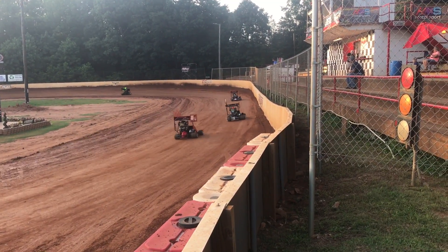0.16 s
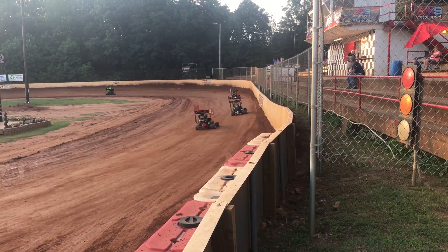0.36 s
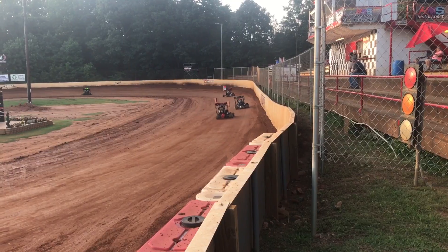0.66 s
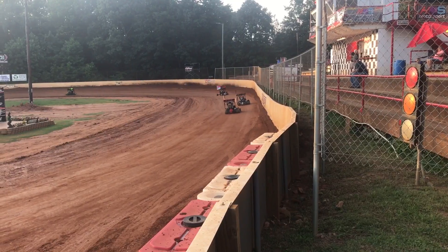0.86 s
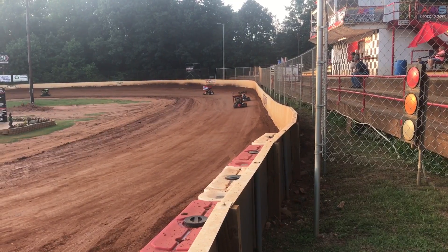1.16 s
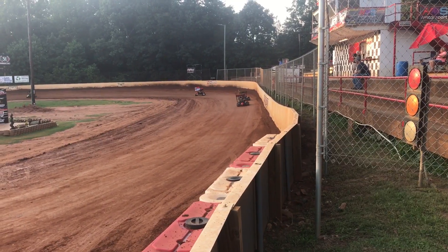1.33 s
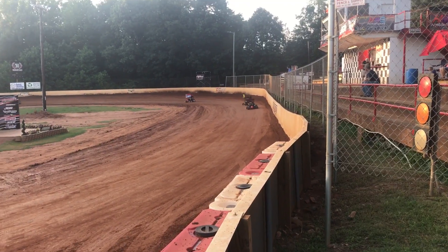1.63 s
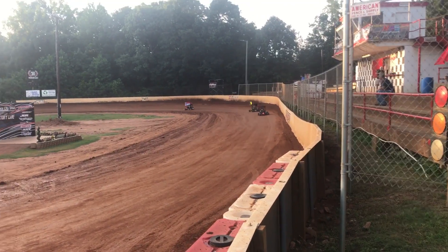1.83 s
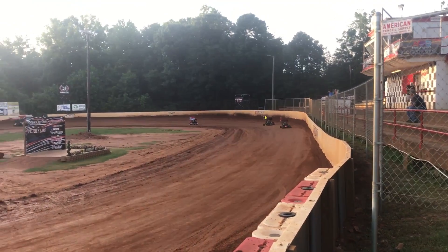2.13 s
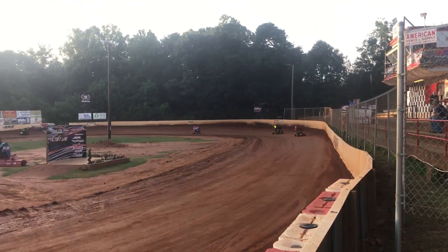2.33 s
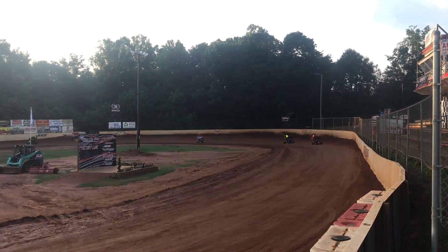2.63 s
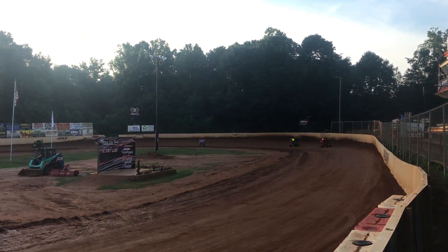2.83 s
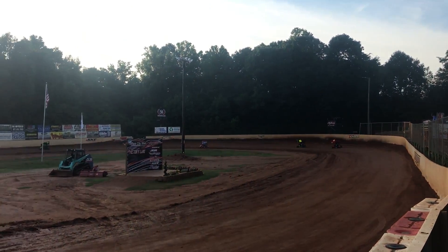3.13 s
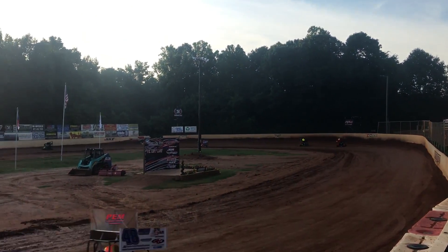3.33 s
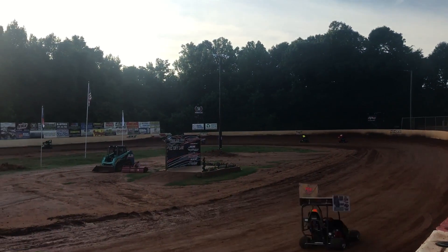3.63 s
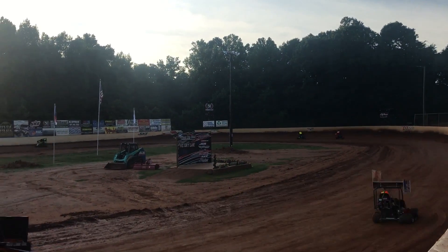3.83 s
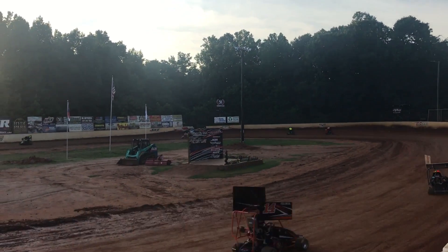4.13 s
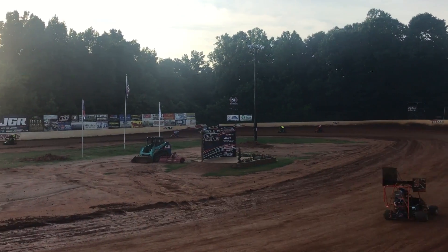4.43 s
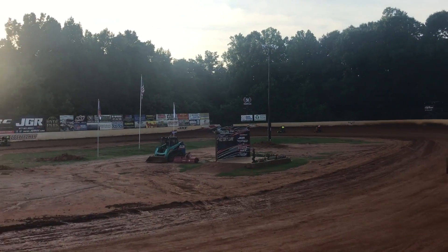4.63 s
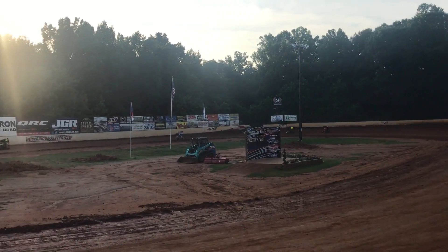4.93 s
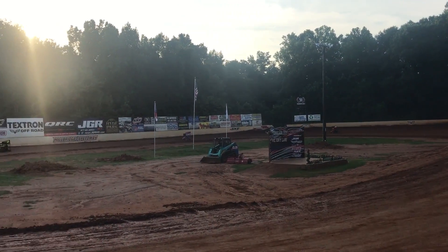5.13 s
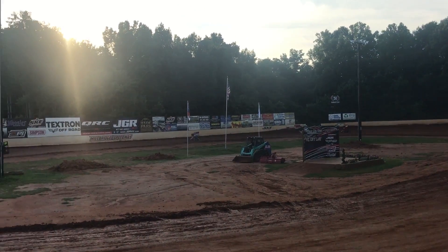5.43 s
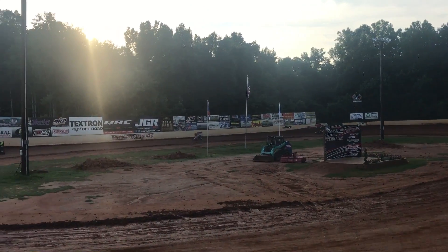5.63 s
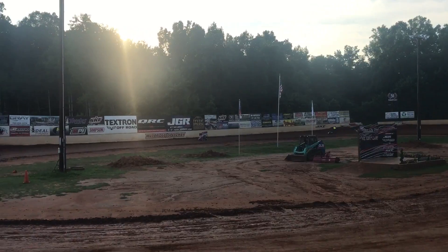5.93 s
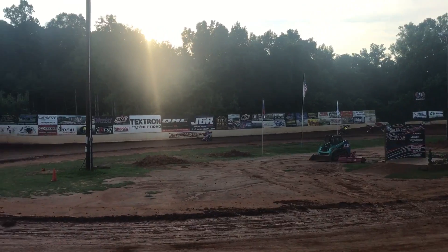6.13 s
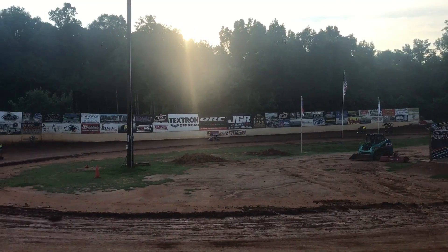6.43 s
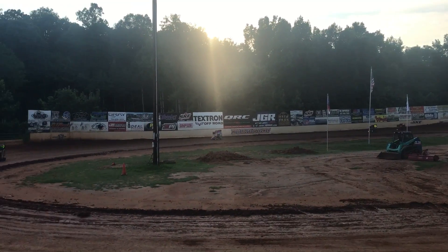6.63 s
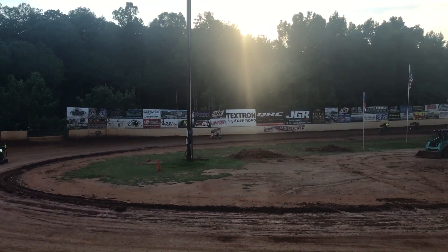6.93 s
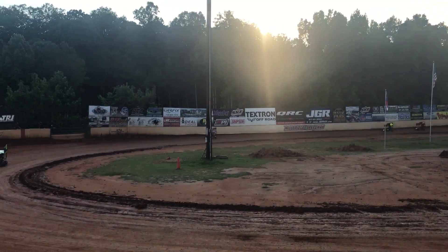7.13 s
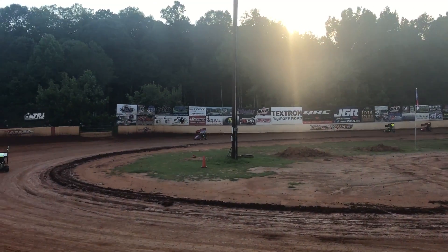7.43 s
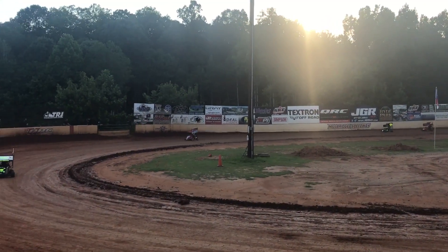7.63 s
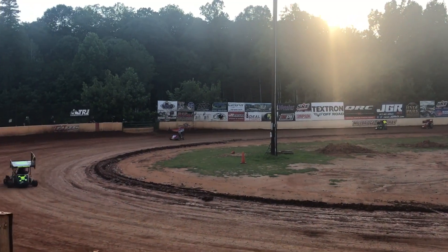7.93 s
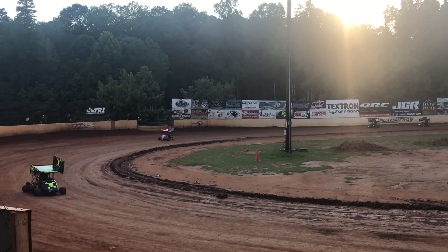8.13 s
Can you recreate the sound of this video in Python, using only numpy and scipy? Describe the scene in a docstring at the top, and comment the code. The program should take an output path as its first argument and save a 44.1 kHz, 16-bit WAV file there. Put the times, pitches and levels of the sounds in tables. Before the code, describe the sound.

A pack of four-stroke karts drones at high revs, each engine a rapid hard-edged buzz with deep throb, hollow bark and gritty hiss. Pitches sag into the turn and climb out, beating against one another. After an early full dropout, the sound returns, softens, surges around three to four seconds, then gradually recedes and dulls, growing slightly again at the end. Close open-air trackside pickup over a distant engine drone.

```python
"""Beside the wall of a dirt oval: karts with single-cylinder four-stroke engines race past the microphone.
Every firing thumps the exhaust pipe, rings the silencer and spits a puff of gas that barks, rasps and sizzles.
Pitch sags into the turn and climbs out of it; tailpipes that swing this way crackle, and engines whine.
Wall, stand and trees throw the noise back over a far drone. The sound cuts out for about a second early on."""
import sys
import numpy as np
from scipy import signal
from scipy.fft import rfft, irfft, next_fast_len
from scipy.io import wavfile
from scipy.ndimage import uniform_filter1d

SR = 44100
rng = np.random.default_rng(int(sys.argv[2]) if len(sys.argv) > 2 else 0)


def digitize_waveform(pressure):
    """Quantize a signal to 16-bit integers and store it at the path in sys.argv[1].

    Rows of a 2-D input are taken as channels; values are limited to [-1, 1].
    """
    field = np.atleast_2d(pressure).T
    bounded = np.clip(field, -1, 1)
    quanta = np.round(bounded * 32767).astype(np.int16)
    wavfile.write(sys.argv[1], SR, quanta)


N = 365148
TIME = np.arange(N) / SR  # s

SAG_HZ_PER_S, SAG_DEPTH_HZ = 4.5, 5.5  # slope of the sag near the apex, and its limit
EXIT_AFTER_S, EXIT_HZ_PER_S = 2.15, 1.7  # this long after the apex the climb steepens by so much
FADE_DB_PER_S = 15.5  # a kart emerges from the pack and sinks back into it
FLARE_LIFT_DB = 2  # weight of a flare's amplitude in bringing its kart forward
SWAY_DB, SWAY_PER_S = 1.5, 4  # each kart's loudness sways as it slides and bounces
RASP_DB, RASP_FOLLOWS = -24, 0.78  # mean level of the rasp, share of the sizzle's swing
GROUND_LOSS = 0.6  # share of the sizzle's swing that the top of the growl follows
SIZZLE_DB, SIZZLE_SWING = 0.3, 1.15  # trim on the sizzle curve's mean, stretch of its swing
CUTOFF_HZ = 15750


def from_db(db):
    """Decibels to gain."""
    return 10 ** (np.asarray(db) / 20)


def rms_one(x):
    """Scale to unit rms."""
    return x / np.sqrt(np.mean(x ** 2) + 1e-20)


def in_time(rows):
    """The columns of a curve table at every sample."""
    s, *columns = np.transpose(rows)
    return [np.interp(TIME, s, c) for c in columns]


def steady(x, seconds):
    """Take out slow swells, keep the single firings."""
    size = int(max(seconds, 0.03) * SR)
    power = uniform_filter1d(uniform_filter1d(x ** 2, size), size)
    return x / np.sqrt(np.abs(power) + 1e-12)


def split(x, hz):
    """The parts of a sound below and above a frequency."""
    low = signal.sosfiltfilt(signal.butter(4, hz, fs=SR, output="sos"), x)
    return low, x - low


def drift(per_s):
    """Slow chance with a spread near 1."""
    return np.interp(TIME * per_s, np.arange(1000), rng.standard_normal(1000))


def fade(x, seconds):
    """Every click becomes an exponential decay."""
    r = np.exp(-1 / (seconds * SR))
    return signal.lfilter([1 - r], [1, -r], x + 1e-18)


def delayed(x, seconds):
    """Read a sound late; the delay may move."""
    return np.interp(TIME - seconds, TIME, x, left=0)


def resonate(x, modes, scale):
    """Parallel resonances, their pitches scaled together."""
    out = 0
    for hz, width, db in modes:
        r = np.exp(-np.pi * width / SR)
        poles = [1, -2 * r * np.cos(2 * np.pi * hz * scale / SR), r * r]
        zeros = [(1 - r * r) / 2, 0, (r * r - 1) / 2]
        out = out + from_db(db) * signal.lfilter(zeros, poles, x + 1e-18)
    return out


def noise(spectrum):
    """Noise of a given colour, rms 1."""
    hz, db = np.transpose(spectrum)
    size = next_fast_len(N)
    bins = np.maximum(np.fft.rfftfreq(size, 1 / SR), 1)
    colour = from_db(np.interp(np.log(bins), np.log(hz), db))
    return rms_one(irfft(rfft(rng.standard_normal(size)) * colour, size)[:N])


def far_drone():
    """Karts on the far side, blurred by distance into steady coloured noise."""
    # colour of the drone: f/Hz, relative level/dB per Hz
    drone_colour = [(20, -35.5), (68, -14.5), (102, -3), (135, -9.5), (260, -4.5), (370, -13), (650, -17.5),
                    (1100, -21), (2000, -30.5), (16000, -38.5)]
    return from_db(-24.5) * noise(drone_colour)


def surroundings(x, wet_db, t60):
    """Scattered echoes from the stand, the boards and the trees."""
    t = np.arange(SR) / SR
    hits = rng.random(SR) < 400 / SR  # about 400 echoes per second
    echoes = rng.standard_normal(SR) * hits * from_db(-60 * t / t60) * (t > 0.012)
    echoes = echoes / np.sqrt(np.sum(echoes ** 2))
    return x + from_db(wet_db) * signal.fftconvolve(x, echoes)[:N]


def whine(rate):
    """Clean high orders of one engine, each swelling and fading on its own."""
    # multiples of the firing rate
    orders = [18, 19, 20, 21, 26, 28, 31]
    # mean strength of each order: relative level/dB
    orders_db = [0, -8.5, 0.5, -1, -9.5, -6, -8.5]
    turn = 2 * np.pi * np.cumsum(rate * (1 + 0.001 * drift(14))) / SR
    tones = 0
    for order, db in zip(orders, orders_db):
        tones = tones + from_db(db + 2 * drift(7)) * np.sin(order * turn)
    return rms_one(tones)


def gas(puffs, colour, between_db):
    """Turbulence that flares with each puff over a weaker steady rush."""
    return noise(colour) * np.sqrt(puffs + from_db(between_db) ** 2)


def gas_sizzle(puffs):
    """The finest turbulence of the puffs, at the very top."""
    # colour of the gas noise: f/Hz, relative level/dB per Hz
    sizzle_colour = [(7500, -24.5), (9200, 0.5), (9900, 0.5), (10450, -3.5), (11300, -1), (12500, -0.5),
                     (15800, -6)]
    return steady(gas(puffs, sizzle_colour, between_db=-0.5), seconds=0.1)


def gas_rasp(puffs, crackle_power):
    """Treble turbulence of the puffs, plus the crackle of tailpipes that point this way."""
    # colour of the gas noise: f/Hz, relative level/dB per Hz
    rasp_colour = [(1300, -41.5), (2000, -2), (2600, -0.5), (4200, -2.5), (4900, -6.5), (5600, -3.5),
                   (6800, -2.5), (7600, -6), (8400, -4), (9300, -10), (11000, -35.5)]
    # colour of the crackle: f/Hz, relative level/dB per Hz
    crackle_colour = [(1500, -29), (2500, -0.5), (3200, -1.5), (4600, -9), (5800, -0.5), (6800, 0.5),
                      (8000, -12), (15000, -32.5)]
    crackle = noise(crackle_colour) * np.sqrt(crackle_power)
    return steady(gas(puffs, rasp_colour, between_db=-1.5), seconds=0.3) + crackle


def silencer_bark(ring, puffs, near_db):
    """Silencer ring, echoed by the surroundings, mixed with the middle turbulence of the puffs."""
    # colour of the gas noise: f/Hz, relative level/dB per Hz
    bark_colour = [(250, -27), (500, -9.5), (720, -5.5), (980, 0), (1400, -4), (1900, -6), (2400, -18),
                   (4000, -50)]
    band = signal.butter(2, [620, 1900], "band", fs=SR, output="sos")
    ring = surroundings(signal.sosfilt(band, ring), wet_db=0.5, t60=0.5)
    ring = steady(ring, seconds=0.15)
    rush = steady(gas(puffs, bark_colour, between_db=-0.5), seconds=0.1)
    # the bark gains an edge when a kart is close
    dull, edge = split(from_db(-3.5) * ring + from_db(-3.0) * rush, hz=1544)
    return dull + edge * from_db(0.5 * near_db)


def exhaust_pipes(boom, growl_db, swing_db):
    """Pipe boom with its echoes: a deep throb below and a growl above."""
    # the pipe's own resonance, ahead of a 1 % lowering: f/Hz, width/Hz, level/dB
    pipe_modes = [(409.6, 49, 1)]
    # level of the deep throb: t/s, level/dB
    throb_curve = [(1.0, -21.0), (2.0, -26), (2.27, -21.5), (2.42, -30.5), (3.15, -17), (4.35, -22.5),
                   (4.65, -21), (4.9, -24.5), (5.1, -16.5), (5.27, -30), (5.9, -22.5), (6.58, -27),
                   (7.1, -21.5), (8.25, -22.5)]
    throb_db, = in_time(throb_curve)
    boom = boom + resonate(boom, pipe_modes, 0.99)
    throb, growl = split(surroundings(boom, wet_db=-7.0, t60=0.47), hz=165)
    # soft ground swallows the top orders of far karts
    body, top = split(growl, hz=350)
    growl = body + top * from_db(GROUND_LOSS * swing_db)
    # uneven burning roughens the growl
    growl = growl * from_db(1.4 * drift(130))
    throb = from_db(throb_db) * steady(throb, seconds=0.33)
    return throb + from_db(growl_db - 1.0) * steady(growl, seconds=0.19)


def firing_rate(apex_s, apex_hz, climb, top_hz):
    """Revs sag into the turn, then climb from the apex until the engine is flat out."""
    before, after = np.maximum(apex_s - TIME, 0), np.maximum(TIME - apex_s, 0)
    sag = SAG_DEPTH_HZ * np.tanh(SAG_HZ_PER_S * before / SAG_DEPTH_HZ)
    rise = climb * after + EXIT_HZ_PER_S * np.maximum(after - EXIT_AFTER_S, 0)
    return np.minimum(apex_hz + sag + rise, top_hz)


def presence(from_s, until_s):
    """Gain of a kart that emerges, holds its place and sinks back."""
    outside_s = np.maximum(from_s - TIME, 0) + np.maximum(TIME - until_s, 0)
    return from_db(-FADE_DB_PER_S * outside_s)


def flare(run):
    """Power that one kart's tailpipe beams at the microphone as it swings past."""
    # flares: run, t/s, peak level/dB relative to the rasp, width/s (power falls to about a third there)
    swings = [("A", 0.14, -6, .2), ("A", 2.18, -8, .12), ("E", 2.9, -11, 0.25), ("E", 3.8, -7.5, .1),
              ("F", 3.9, -7.5, .12), ("F", 5.14, -7, .14), ("F", 5.61, 4.2, 0.09), ("F", 6.36, -1.5, 0.19),
              ("F", 6.3, -2.5, .13)]
    power = 0
    for name, s, db, width in swings:
        if name == run:
            power = power + from_db(db) ** 2 / (1 + ((TIME - s) / width) ** 2) ** 1.5
    return power


def firings(cycles, jitter_s, uneven_db):
    """One click per combustion, each a little off in time and strength."""
    chance = rng.standard_normal((int(cycles[-1]), 2))
    at = np.interp(np.arange(1, len(chance) + 1), cycles, TIME) + jitter_s * chance[:, 0]
    clicks = np.zeros(N)
    clicks[np.clip((at * SR).astype(int), 0, N - 1)] = from_db(uneven_db * chance[:, 1])
    return clicks


def pipe_wave(cycles, build_db, smear, size=512):
    """The exhaust pressure wave: a blow-down, then ringing until the next firing."""
    # tailpipe orders 1, 2, 3, .. of the firing rate, before each kart's own spread: level/dB
    pipe_db = [-13, -4.5, -12.5, -11.5, -2, -4, -14.5, -14, -9.5, -13.5, -14.5, -12.5, -23, -17.5, -26.5,
               -26]
    orders = np.arange(size // 2 + 1)
    level_db = np.interp(orders, np.arange(len(pipe_db)) + 1, pipe_db, left=-40, right=-50)
    level_db = level_db + build_db * rng.standard_normal(len(orders))
    cepstrum = irfft(np.log(from_db(level_db)))
    # a causal cycle: all its energy follows the valve opening
    cepstrum[1:size // 2] *= 2
    cepstrum[size // 2 + 1:] = 0
    # the silencer holds the higher orders back, which blunts the peak
    spectrum = np.exp(rfft(cepstrum) - 1j * smear * orders ** 2)
    cycle = -irfft(spectrum * (orders <= len(pipe_db)))
    return np.interp(cycles % 1 * size, np.arange(size + 1), np.append(cycle, cycle[0]))


def kart(rate, gain, build_spread, puff_rise_s, puff_fall_s, crack_fall_s, beaming):
    """One engine: pipe boom, silencer ring, and the power of its gas puffs and cracks."""
    # silencer can, before each kart's own spread: f/Hz, width/Hz, level/dB
    can_modes = [(633, 200, -9.5), (934, 120, -3), (1130, 240, -9), (1480, 660, -6.5)]
    cycles = np.cumsum(rate * (1 + 0.003 * drift(14))) / SR + rng.random()
    boom = gain * pipe_wave(cycles, build_db=1.1, smear=0.0509) * from_db(1.8 * drift(35))
    clicks = gain * firings(cycles, jitter_s=0.00011, uneven_db=1.22)
    ring = resonate(clicks, can_modes, 1 + build_spread * rng.uniform(-1, 1))
    # treble is beamed out of the tailpipe, so the best placed kart owns the rasp
    blasts = clicks ** (2 * beaming)
    puffs = fade(fade(blasts, puff_rise_s), puff_fall_s)
    cracks = fade(fade(blasts, 0.00038), crack_fall_s)
    # the track wall returns each puff a few milliseconds later
    wall_s = 0.0033 * (1 + 0.3 * np.sin(2 * np.pi * (0.46 * TIME + rng.random())))
    puffs = puffs + from_db(-16.5) * delayed(puffs, wall_s)
    return boom, ring, puffs, cracks


def pack():
    """All karts together: boom, ring, power of the puffs and of the crackle, and whine."""
    # one row per run through a turn: name, apex t/s, firing rate at the apex f/Hz, climb/(Hz per s),
    # flat-out rate f/Hz, heard from t/s, heard until t/s, prominence level/dB, whine level/dB
    runs = [("A", 0, 41.7, 2.85, 47.7, 0, 2.4, -3.5, -47), ("B", 0, 43.2, 2.6, 49.7, 0, 2, -7, -41.5),
            ("C", 0, 45.7, 4.1, 52.2, 0.25, 2.14, -6.5, -39), ("D", 0, 51.7, 2.7, 55, 0, 1.1, -9.5, -43.5),
            ("E", 3.97, 42.7, 2.35, 55, 2.65, 8.28, -5, -43),
            ("F", 4.66, 43.1, 2.45, 55.5, 3.1, 7, -3, -32.5),
            ("G", 4.5, 47.8, 2.5, 51, 6.5, 8.28, -2.2, -46),
            ("H", 7.9, 46.1, 0.36, 52, 7.45, 8.28, -1.9, -41)]
    karts = []
    for name, apex_s, apex_hz, climb, top_hz, from_s, until_s, prominence_db, whine_db in runs:
        rate = firing_rate(apex_s, apex_hz, climb, top_hz)
        heard = presence(from_s, until_s)
        beam = flare(name)
        lift = (1 + from_db(FLARE_LIFT_DB) * beam ** 0.5) ** 0.5
        gain = from_db(prominence_db + SWAY_DB * drift(SWAY_PER_S)) * heard * lift
        boom, ring, puffs, cracks = kart(rate, gain, build_spread=0.02, puff_rise_s=0.00026,
                                         puff_fall_s=0.0022, crack_fall_s=0.0015, beaming=1.7)
        # only the kart whose tailpipe points this way crackles
        crackle = beam * steady(np.sqrt(cracks), seconds=0.088) ** 2
        karts.append((boom, ring, puffs, crackle, from_db(whine_db) * heard * whine(rate)))
    return np.sum(karts, axis=0)


def scene():
    """The engines beat against each other over the drone of the far side."""
    # the whole pack as it draws away and comes past, ahead of the trims below:
    # t/s, pipe growl level/dB, bark level/dB, top sizzle level/dB
    pack_curve = [(0.1, -19.0, -27, -26.5), (0.7, -20.5, -23.0, -28.5), (1.0, -19.0, -26.5, -30),
                  (2.0, -19, -21, -27.5), (2.25, -22.0, -26.5, -29.5), (2.45, -23.5, -26.5, -33.5),
                  (2.85, -16.5, -22.5, -31.0), (3.2, -16.5, -20.5, -25), (4.15, -18.5, -23.5, -26.5),
                  (4.8, -21, -27.5, -29), (5.5, -19.5, -26, -29), (6.5, -21, -25, -31.5),
                  (7.35, -24, -29, -38.5), (8.0, -23, -27.5, -37.0), (8.25, -19.5, -26, -34.0)]
    boom, ring, puffs, crackle_power, whines = pack()
    growl_db, bark_db, sizzle_db = in_time(pack_curve)
    mean_sizzle_db = np.mean(sizzle_db)
    swing_db = sizzle_db - mean_sizzle_db
    near_db = bark_db - np.mean(bark_db)
    rasp_db = RASP_DB + RASP_FOLLOWS * swing_db
    top_db = mean_sizzle_db + SIZZLE_DB + SIZZLE_SWING * swing_db
    # puffs stand out when the rasp is loud and blur as the karts draw away
    clarity = from_db(0.6 * (rasp_db - np.max(rasp_db)))
    puffs = puffs / uniform_filter1d(puffs, SR // 8) * clarity
    pipes = exhaust_pipes(boom, growl_db, swing_db)
    bark = from_db(bark_db - 0.5) * silencer_bark(ring, puffs, near_db)
    rasp = from_db(rasp_db) * gas_rasp(puffs, crackle_power)
    sizzle = from_db(top_db) * gas_sizzle(puffs)
    return (far_drone() + whines + sizzle + rasp + bark + pipes)[None]


def record(dry):
    """Peaks are rounded, the sound drops out briefly, the top is cut."""
    # the dropout: t/s, level/dB
    dropout_curve = [(1.031, 0), (1.035, -22), (1.053, -28), (1.062, -130), (1.957, -130), (1.959, 0)]
    gate_db, = in_time(dropout_curve)
    rounded = dry / (1 + dry ** 4) ** (1 / 4)
    low_pass = signal.ellip(12, 0.1, 80, CUTOFF_HZ, fs=SR, output="sos")
    return signal.sosfilt(low_pass, rounded * from_db(gate_db))


dry = scene()
out = record(dry)
digitize_waveform(out)
```